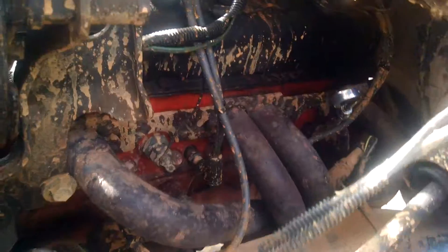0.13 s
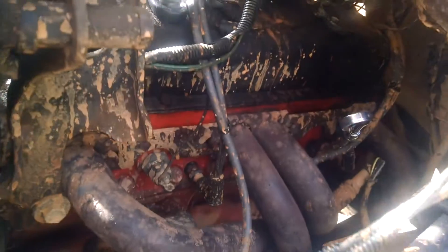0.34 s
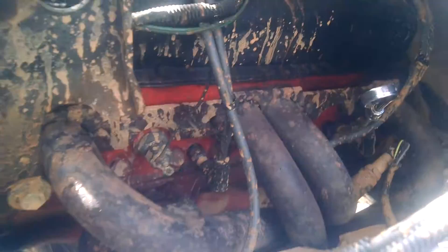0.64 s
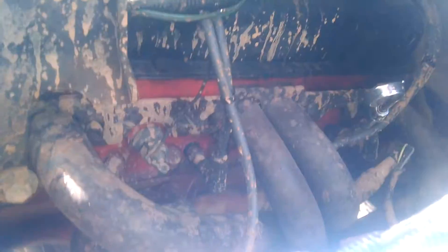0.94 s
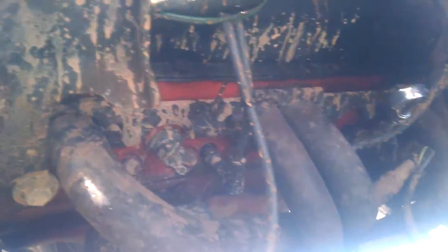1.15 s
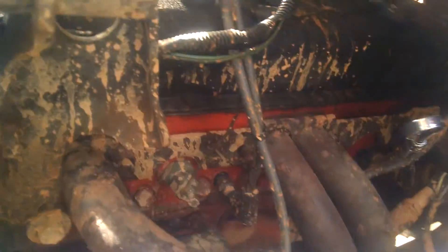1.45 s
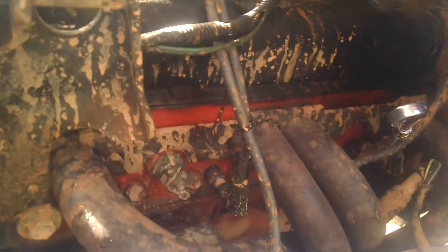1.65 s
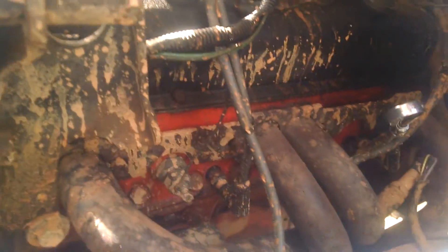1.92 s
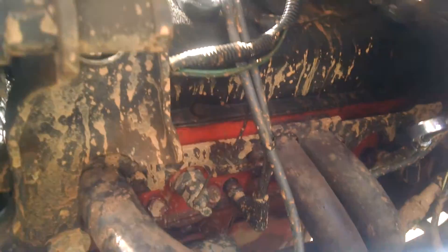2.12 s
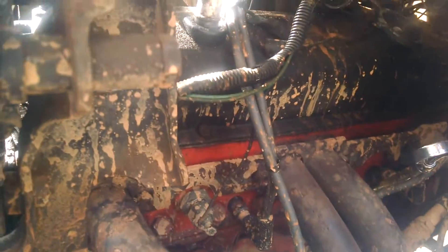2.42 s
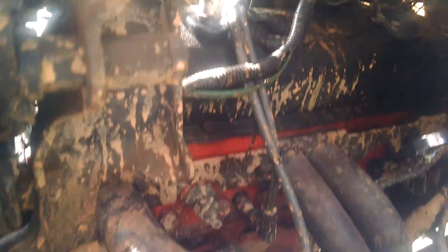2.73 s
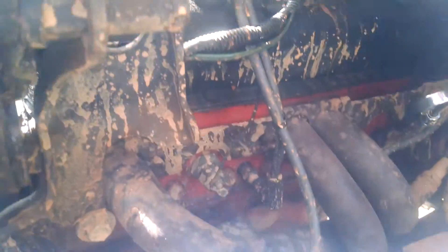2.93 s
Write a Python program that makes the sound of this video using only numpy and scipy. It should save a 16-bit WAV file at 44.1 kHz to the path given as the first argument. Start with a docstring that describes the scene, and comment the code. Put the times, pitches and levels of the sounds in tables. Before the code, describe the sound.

A big engine idles steadily, heard very close inside its metal bay: lumpy throbbing drone, rushing fan air, rapid valve patter, a regular tappet clack and hollow knocking that is strongest early and softens later.

```python
"""A big engine idles at about 690 rpm, heard close up inside its bay; the sound fades in within a quarter second.
From then on, lumpy firing orders drone under a rush of fan air and valve-train patter, built from tones and
filtered noise. One tappet clacks once a cycle, and a hollow knock, a bank of ringing modes, rattles about once a turn.
Stray ticks and light scrapes, probably a belt, come in early; dull thuds follow, and later the knock softens.
The metal walls add short reflections to the rush and the scrapes."""
import sys
import numpy as np
from scipy import signal
from scipy.fft import rfft, irfft, next_fast_len
from scipy.io import wavfile
from scipy.ndimage import uniform_filter1d

SR = 44100
rng = np.random.default_rng(int(sys.argv[2]) if len(sys.argv) > 2 else 0)


def pcm_store(signal):
    """Save signal as 16-bit PCM."""
    levels = np.round(np.clip(np.atleast_2d(signal), -1, 1) * 32767)
    wavfile.write(sys.argv[1], SR, levels.astype(np.int16).T)


N = 135387  # length [samples]


def undb(db):
    """Decibels to gain."""
    return 10 ** (np.asarray(db) / 20)


def level(x, db):
    """Set the rms level, both sides taken together."""
    return x * undb(db) / np.sqrt(np.mean(x ** 2))


def curve(points):
    """Gain over time from (time [s], level [dB]) points."""
    return undb(np.interp(np.arange(N) / SR, *np.array(points).T))


def noise():
    """Two unrelated white noises."""
    return rng.standard_normal((2, N))


def walk(rate):
    """Smooth random wander with a spread of 1, taking about `rate` new values a second."""
    hold = int(SR / rate)
    steps = np.repeat(rng.standard_normal(N // hold + 1), hold)
    smooth = uniform_filter1d(uniform_filter1d(steps, hold), hold)[:N]
    return (smooth - smooth.mean()) / smooth.std()


def across(points, size):
    """A table by frequency, spread over the bins of a transform along a log axis."""
    hz, value = np.array(points).T
    bins = np.fft.rfftfreq(size, 1 / SR) + 1e-3  # keeps the log finite at 0 Hz
    return np.interp(np.log(bins), np.log(hz), value)


def colour(x, points):
    """Minimum-phase filter with the given spectrum, so that no sound precedes its cause."""
    size = 8192
    cepstrum = irfft(np.log(undb(across(points, size))))
    # fold the cepstrum onto its causal half
    cepstrum[1:size // 2] *= 2
    cepstrum[size // 2 + 1:] = 0
    response = irfft(np.exp(rfft(cepstrum)))[:size // 2]
    return signal.fftconvolve(x, response[None])[:, :N]


def ring(x, modes):
    """Drive a set of decaying sine modes (pitch [Hz], t60 [s], level [dB])."""
    t = np.arange(SR // 5) / SR
    body = 0
    for hz, t60, db in modes:
        body = body + undb(db) * np.exp(-np.log(1000) * t / t60) * np.sin(2 * np.pi * hz * t)
    return signal.fftconvolve(x, body[None])[:, :N]


ATTACK_S = .0012  # time constant of the rise


def bursts(events, decay_s):
    """Envelope of blows (time [s], level [dB]) whose powers add; each rises quickly and dies away."""
    power = np.zeros(N)
    for s, db in events:
        if 0 <= s * SR < N:
            power[int(s * SR)] += undb(db) ** 2
    fall = np.sqrt(signal.lfilter([1], [1, -np.exp(-2 / (decay_s * SR))], power + 1e-18))
    keep = np.exp(-1 / (ATTACK_S * SR))
    return signal.lfilter([1 - keep], [1, -keep], fall)


MODE_SCATTER_DB = 1.2  # spread of each mode from hit to hit


def rattle(events, blows, contact_s, modes):
    """Each event (time [s], pitch factor, level [dB]) rings modes by rough blows; the mix of modes varies."""
    out, size = np.zeros((2, N + SR)), SR // 8
    envelope = bursts(blows, contact_s)[:size]
    for s, pitch, db in events:
        force = envelope * rng.standard_normal((2, size))
        start = int(s * SR)
        for hz, t60, mode_db in modes:
            pole = np.exp((2j * np.pi * hz * pitch - np.log(1000) / t60) / SR)
            hit = signal.lfilter([1], [1, -pole], force).imag
            hit = hit / hit.std(axis=1, keepdims=True)
            gain = undb(db + mode_db + MODE_SCATTER_DB * rng.standard_normal())
            out[:, start:start + size] += gain * hit
    return out[:, :N]


def beats(cycle, count):
    """Times [s] of something that happens `count` times a cycle."""
    return np.flatnonzero(np.diff(np.floor(cycle * count))) / SR


BAY_DB, BAY_T60_S, BAY_LOW_HZ = -11, .05, 1780  # BAY_LOW_HZ: reflections are high-passed here


def bay(x):
    """Metal walls return dense, short, bright reflections, made by convolving with decaying noise."""
    t = np.arange(SR // 10) / SR
    walls = rng.standard_normal((2, len(t))) * np.exp(-np.log(1000) * t / BAY_T60_S)
    walls = walls / np.linalg.norm(walls, axis=1, keepdims=True)
    wet = signal.fftconvolve(x, walls, axes=1)[:, :N]
    wet = signal.sosfilt(signal.butter(2, BAY_LOW_HZ, "high", fs=SR, output="sos"), wet)
    return x + undb(BAY_DB) * wet


# likeness of left and right: (frequency [Hz], correlation [-1 to 1])
LIKENESS = [(40, -.65), (95, .3), (170, .05), (220, -.4), (420, .55), (600, .68), (750, .2), (840, .72),
            (1030, .95), (1250, .98), (1560, .92), (1800, .1), (2050, .15), (2300, -.8), (2520, -.98),
            (2760, -.98), (2980, -.4), (3400, .2), (3900, .85), (4300, .47), (4800, -.28), (5300, -.7),
            (5900, -.15), (6700, .45), (8100, -.38), (9300, .35), (10500, -.27), (12000, .26),
            (13500, -.23), (15000, .3)]
# stereo balance: (frequency [Hz], left minus right [dB])
BALANCE = [(40, -2), (100, 4.5), (170, 2), (290, 4), (500, -1.5), (800, 2), (1900, -0.5), (5500, 0),
           (8000, -3), (9500, -7), (12000, -6), (15000, -4)]


def ports(pair):
    """Blend two unrelated versions of a sound into left and right, alike in some bands and opposed in others."""
    size = 2 * next_fast_len(N)
    a, b = rfft(pair, size)
    alike = np.clip(across(LIKENESS, size), -.99, .99)
    mid = a * np.sqrt((1 + alike) / 2)
    side = b * np.sqrt((1 - alike) / 2)
    lean = undb(across(BALANCE, size))
    sides = np.array([(mid + side) * lean, mid - side])
    return irfft(sides * np.sqrt(2 / (1 + lean ** 2)), size)[:, :N]  # the lean keeps the total power


# tone of the rushing air and the patter: (frequency [Hz], relative level [dB])
RUSH_SPECTRUM = [(100, -17), (800, 6), (1800, -2), (2120, 3.5), (2300, 6), (2460, -10), (2650, 1),
                 (2950, 1), (3500, 4.5), (4200, 3), (5300, 0.5), (6200, -0.5), (8000, -1.5), (9300, 1),
                 (11000, -4.5), (13500, -7), (15500, -10)]
# swells of the rush: (time [s], level [dB])
RUSH_SWELL = [(.25, 0), (.6, 0.3), (.85, 2.5), (.9, -2), (1.0, 0.5), (1.35, 0.7), (1.45, -0.5), (1.65, 1.5),
              (1.79, -0.5), (1.92, 1.5), (2.68, 0), (2.76, 1.8), (2.85, -1), (2.95, 1.4)]
RUSH_DB, RUSH_WAVER_DB, RUSH_GRAIN_DB, RUSH_GRAIN_RATE = -29, 0.36, 1.3, 300  # levels before the swell; rate [1/s]
PATTER_DB, PATTER_DECAY_S, PATTER_SCATTER_DB = -32.5, 0.027, 7


def rush(cycle):
    """Fan air is wavering coloured noise; sixteen valves a cycle patter as noise bursts, all under one fine grain."""
    valves = [(s, PATTER_SCATTER_DB * rng.uniform(-1.0, 1)) for s in beats(cycle, count=16)]
    patter = colour(noise() * bursts(valves, PATTER_DECAY_S), RUSH_SPECTRUM)
    air = colour(noise() * undb(RUSH_WAVER_DB * walk(20)), RUSH_SPECTRUM)
    grain = undb(RUSH_GRAIN_DB * walk(RUSH_GRAIN_RATE))
    return (level(air, RUSH_DB) + level(patter, PATTER_DB)) * curve(RUSH_SWELL) * grain


# hissing scrapes: (time of the peak [s], half-length to -17 dB [s], relative level [dB])
SCRAPES = [(0.274, 0.011, -3), (0.687, 0.0067, -3), (0.82, 0.018, -1), (0.847, 0.018, -1),
           (0.998, 0.054, -8), (1.173, 0.069, -6), (1.352, 0.01, -2), (1.517, 0.02, -1.5),
           (1.693, 0.027, -5), (2.203, 0.016, -4.5), (2.382, 0.021, -3), (2.716, 0.025, 1.5),
           (2.905, 0.0074, 0), (3.066, 0.023, -1)]
# tone of a scrape: (frequency [Hz], relative level [dB])
SCRAPE_SPECTRUM = [(500, -17), (2500, 16), (4000, 3), (5300, 7), (7000, 7.5), (9500, 5), (12000, -2.5),
                   (16000, 1)]
SCRAPE_DB, SCRAPE_GRAIN_DB = -36.5, 4.5  # the grain never exceeds this depth either way


def scrapes():
    """Light rubbing, probably a belt: bell-shaped swells of hiss, roughened by a fast random grain."""
    t = np.arange(N) / SR
    swell = sum(undb(db) * np.exp(-2 * ((t - s) / length) ** 2) for s, length, db in SCRAPES)
    grain = undb(SCRAPE_GRAIN_DB * np.tanh(walk(700)))
    return level(colour(noise() * swell * grain, SCRAPE_SPECTRUM), SCRAPE_DB)


# dull thuds from different panels: (time [s], pitch [Hz], relative level [dB])
THUDS = [(.729, 413, -6), (.853, 424, 0), (.863, 226, -1), (.93, 295, -2.5), (.951, 238, -4),
         (1.104, 344, 3.5), (1.197, 294, -0.5), (1.296, 280, -3), (1.377, 523, 0), (1.466, 246, -5),
         (2.062, 172, 1), (2.114, 298, -2), (2.226, 258, -0.5), (2.722, 676, -7), (2.822, 153, -7)]
# modes of a panel: (multiple of its pitch, t60 [s], relative level [dB])
THUD_MODES = [(.68, .035, -5.5), (1, 0.043, -0.5), (1.28, 0.072, -5)]
THUD_DB, THUD_DECAY_S = -33, 0.0028


def thuds():
    """A single short blow sets three damped modes of a panel ringing."""
    return level(rattle(THUDS, [(0, 0)], THUD_DECAY_S, THUD_MODES), THUD_DB)


# stray sharp ticks: (time [s], relative level [dB])
TICKS = [(.2707, -2), (1.3447, 0), (1.356, 7), (1.5118, -0.5), (2.2043, -0.5), (2.7161, 0)]
# the loud tappet, once per cycle of two turns; the times also set the engine speed:
# (time [s], relative crack level [dB], relative ring level [dB])
TAPPETS = [(.147, -9, -4), (0.3227, 1.5, -0.5), (.502, -4, -2.5), (.687, -4, -0.5), (0.87, -3, -3),
           (1.051, -0.5, 4), (1.232, 0, 0.5), (1.4, 2, 3), (1.5684, 3.5, -3), (1.7363, 2.5, -1),
           (1.903, -10, 3), (2.0766, -0.5, 2), (2.2503, 4.5, 1), (2.427, 3.5, 3), (2.5996, 0, 3.5),
           (2.775, 1.5, 4), (2.947, 5, 2.5)]
# tone of a crack or tick: (frequency [Hz], relative level [dB])
CRACK_SPECTRUM = [(500, 0), (2000, 5), (4000, -1), (7000, 0), (9500, 1.5), (13000, -1.5), (16000, 0.5)]
# rebounds within a clack: (delay [s], relative level [dB])
TAPPET_BLOWS = [(0, 4), (.0065, 5), (0.014, -35)]
# metallic modes of the tappet: (pitch [Hz], t60 [s], relative level [dB])
TAPPET_MODES = [(1879, 0.097, 6.1), (1927, 0.027, 4.5), (2012, 0.068, 12)]
CRACK_DB, CRACK_DECAY_S, TICK_DB, TICK_DECAY_S = -36.3, .005, -43.5, 0.0027
RING_DB, RING_CONTACT_S = -39, 0.00052


def tappet():
    """Each clack is a bright noise crack and a short metallic ring; stray ticks fall in between."""
    crack_force = bursts([(s, db) for s, db, _ in TAPPETS], CRACK_DECAY_S)
    cracks = colour(noise() * crack_force, CRACK_SPECTRUM)
    rings = rattle([(s, 1, db) for s, _, db in TAPPETS], TAPPET_BLOWS, RING_CONTACT_S, TAPPET_MODES)
    ticks = colour(noise() * bursts(TICKS, TICK_DECAY_S), CRACK_SPECTRUM)
    return level(cracks, CRACK_DB) + level(rings, RING_DB) + level(ticks, TICK_DB)


def crank():
    """Engine cycles gone by at each sample, one from each tappet clack to the next."""
    s = np.array(TAPPETS)[:, 0]
    s = np.r_[2 * s[0] - s[1], s, 2 * s[-1] - s[-2]]  # one more cycle at either end
    return np.interp(np.arange(N) / SR, s, np.arange(len(s)))


# knocks, about once a turn: (time [s], relative level [dB])
KNOCKS = [(.192, 0), (.279, 1.5), (.366, -1), (.455, 3), (.548, 1), (.638, 1), (.732, 2), (.822, 5.5),
          (.911, 1.5), (1.003, 0.5), (1.095, 2.5), (1.187, 1), (1.274, -9), (1.43, -17), (1.519, -5),
          (1.606, -1), (1.689, -17), (1.779, -26), (1.857, -6.5), (1.945, -3), (2.028, -4), (2.113, -4),
          (2.203, -4), (2.289, -2), (2.377, 2), (2.467, -6), (2.55, -8), (2.638, 0), (2.726, -2),
          (2.814, -4), (2.902, -6), (2.986, -4.5)]
# rebounds within a knock: (delay [s], relative level [dB])
KNOCK_BLOWS = [(0, -2.5), (.007, 0), (0.0151, -4), (.021, -19.5)]
# hollow modes of the knock: (pitch [Hz], t60 [s], relative level [dB])
KNOCK_MODES = [(1035, .12, 2), (1095, .12, 0), (1160, .11, -2), (1228, .11, -1.5), (1298, .09, -3),
               (1385, .06, -11), (1500, .07, -9), (1578, .07, -8), (1655, .05, -12), (2125, .04, -14)]
KNOCK_DB, KNOCK_CONTACT_S = -30.8, .0025


def knocking():
    """A few rough rebounds excite a cluster of close modes, which ring hollow."""
    knocks = rattle([(s, 1, db) for s, db in KNOCKS], KNOCK_BLOWS, KNOCK_CONTACT_S, KNOCK_MODES)
    return level(knocks, KNOCK_DB)


# strength of the eight firings of a cycle, in turn: (level [dB])
CYLINDERS = [-4.5, -2, -3, 3.5, -5, -0.5, -1, -4]
# tone of the block and bay: (frequency [Hz], relative level [dB])
BLOCK_SPECTRUM = [(20, -2.5), (43, 4.5), (65, -2), (100, 3), (165, 2.5), (205, 1.5), (240, -0.5), (300, 1),
                  (440, -2), (620, -5), (760, -9), (900, -10), (1240, -11), (1700, -13.5), (2200, -18),
                  (3000, -29), (8000, -49)]
# ringing of manifold and covers: (pitch [Hz], t60 [s], relative level [dB])
CASTING_MODES = [(347, 0.083, 3), (449.4, 0.055, 7), (860, 0.046, -1), (1010, 0.042, -21), (1254, 0.048, 2),
                 (1511, 0.088, -0.5), (2420, 0.052, 1), (3600, .07, -37), (4016, 0.11, -11.5),
                 (5760, 0.036, -30)]
BLOCK_DB, CASTING_DB = -24, -32
FIRING_DECAY_S, FIRING_FLOOR, FIRING_SCATTER_DB = 0.019, 0.99, 2  # floor: steady force between firings [gain]


def block(cycle):
    """Every firing shakes the block and the bay with noise, and keeps the castings ringing."""
    firings = []
    for k, s in enumerate(beats(cycle, count=8)):
        firings.append((s, CYLINDERS[k % len(CYLINDERS)] + FIRING_SCATTER_DB * rng.standard_normal()))
    force = FIRING_FLOOR + bursts(firings, FIRING_DECAY_S)
    shake = colour(noise() * force, BLOCK_SPECTRUM)
    castings = ring(noise() * force, CASTING_MODES)
    return level(shake, BLOCK_DB) + level(castings, CASTING_DB)


SIDE_DRIFT_RAD = 0.54  # wander of each side's phase, in opposite directions


def sides(lead, rate):
    """Phase offsets [rad] of left and right: a fixed lead of the left plus a slow drift."""
    return np.array([[1], [-1]]) * (lead / 2 + SIDE_DRIFT_RAD * walk(rate))


# weaker orders: (multiple of the cycle rate, level before the swell [dB], lead of the left side [rad])
ORDERS = [(8, -45.5, 0.5), (15, -35.5, 0.9), (18, -37, -.5), (20, -35, -0.3), (22, -37.5, -4),
          (24, -38, -1.7), (27, -36.5, 1.5), (28, -37.5, 1), (29, -33, 1.5), (30, -35.5, 2)]
# swells of the drone, shared with the throb: (time [s], level [dB])
DRONE_SWELL = [(.3, 1.5), (.65, -2.5), (.92, -1.5), (1.3, 1.5), (1.65, 0), (1.85, -2), (2.1, 1), (3.0, 0)]
ORDER_WAVER_DB, ORDER_DRIFT_RAD = 1.8, .25


def drone(cycle):
    """Weaker orders of the firing pattern are sines, each a little unsteady in level, phase and direction."""
    tones = 0
    for order, db, lead in ORDERS:
        phase = 2 * np.pi * (order * cycle + rng.random()) + ORDER_DRIFT_RAD * walk(8)
        gain = undb(db + ORDER_WAVER_DB * walk(14))
        tones = tones + gain * np.sin(phase + sides(lead, 5.77))
    return np.sqrt(2) * tones * curve(DRONE_SWELL)


# two strong orders that beat three times a cycle:
# (multiple of the cycle rate, level before the swell [dB], lead of the left side [rad])
THROB = [(16, -25, .13), (19, -27.5, -0.45)]
THROB_LEAD_S, THROB_WAVER_DB, THROB_DRIFT_RAD = .007, 1.6, .35


def throb(cycle):
    """Two firm orders share a phase wander and beat, one of the swells falling just before each tappet clack."""
    ahead = cycle + THROB_LEAD_S * SR * np.gradient(cycle)
    wander = 2 * np.pi * rng.random() + THROB_DRIFT_RAD * walk(5.83)
    tones = 0
    for order, db, lead in THROB:
        gain = undb(db + THROB_WAVER_DB * walk(9.92))
        tones = tones + gain * np.sin(2 * np.pi * order * ahead + wander + sides(lead, 5.83))
    return np.sqrt(2) * tones * curve(DRONE_SWELL)


def scene():
    """All parts of the engine together; one crank motion times the rush, the block and the orders."""
    cycle = crank()
    airy = bay(rush(cycle) + scrapes())
    blows = thuds() + tappet() + knocking()
    return ports(airy + blows + block(cycle)) + drone(cycle) + throb(cycle)


# fade-in of the whole sound: (time [s], level [dB])
FADE = [(.113, -67), (0.116, -23.5), (.145, -8), (.18, -5), (.215, -2.5), (.25, 0.5)]
TOP_HZ = 15550


def record(dry):
    """Fade the sound in and cut the top with a steep low-pass."""
    low_pass = signal.ellip(12, .2, 80, TOP_HZ, fs=SR, output="sos")  # ripple, stopband [dB]
    return signal.sosfilt(low_pass, dry * curve(FADE))


dry = scene()
out = record(dry)
pcm_store(out)
```